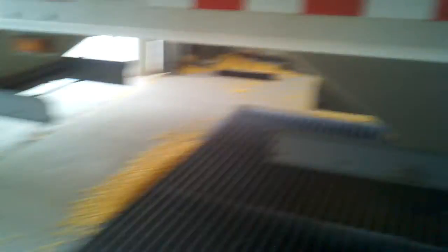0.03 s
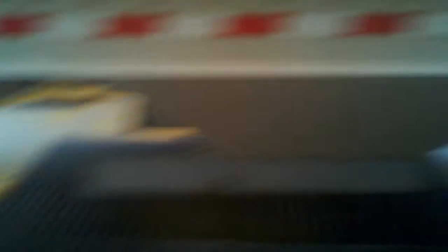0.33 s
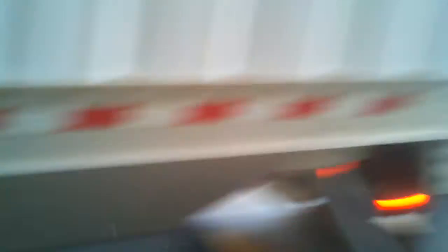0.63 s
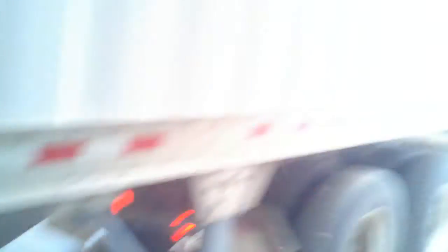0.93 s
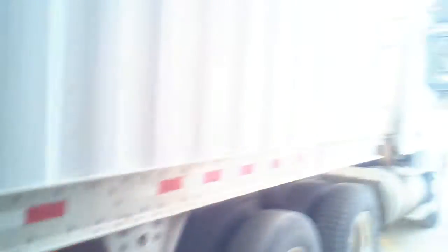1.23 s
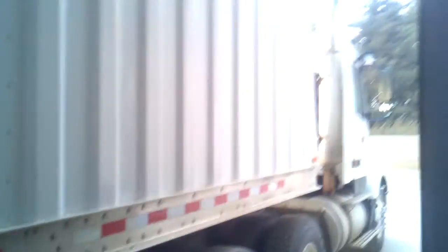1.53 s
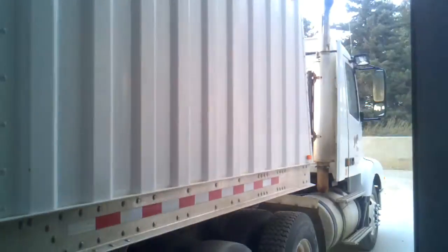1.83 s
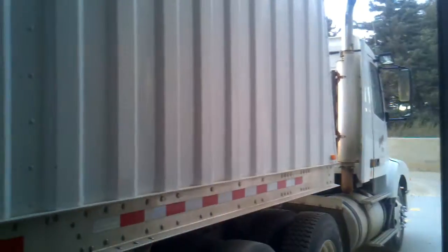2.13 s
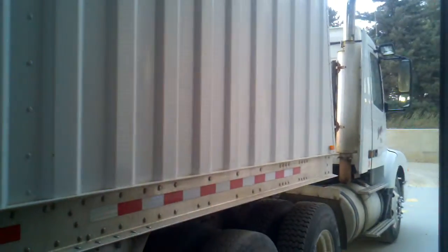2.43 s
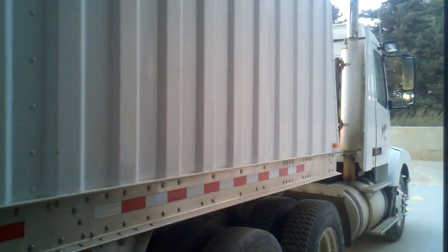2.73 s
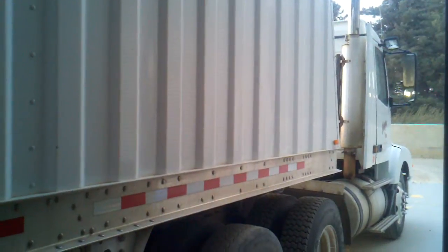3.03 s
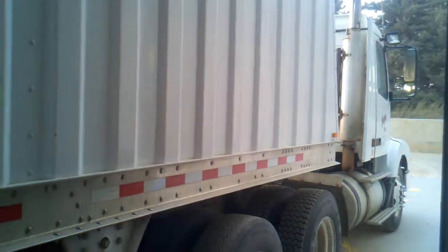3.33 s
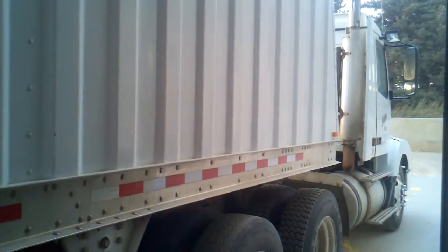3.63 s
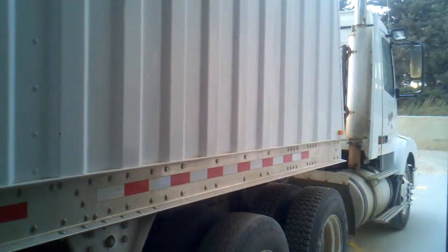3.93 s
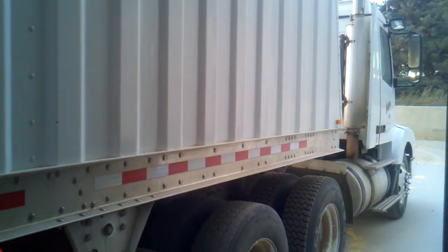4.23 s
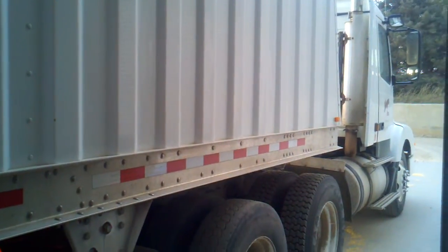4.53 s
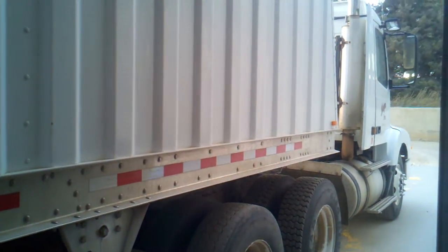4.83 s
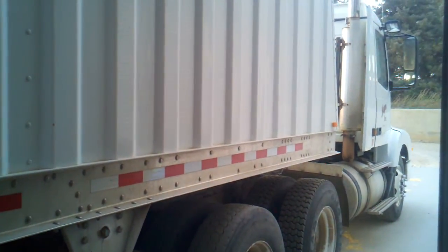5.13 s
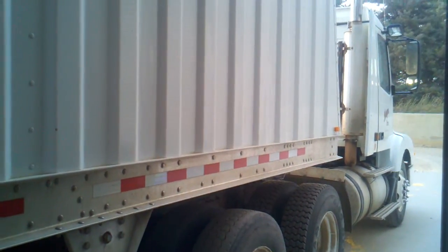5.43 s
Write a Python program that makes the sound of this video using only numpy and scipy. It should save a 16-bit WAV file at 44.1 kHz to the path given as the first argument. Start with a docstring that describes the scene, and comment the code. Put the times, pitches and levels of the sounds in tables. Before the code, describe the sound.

A truck unloads hissing, splashing grain amid steady engine and conveyor noise, while wind starts to buffet and slap the microphone.

```python
"""A grain truck unloads at an elevator, heard through the two microphone ports of a hand-held camera.
From the start, engine and conveyor roar, a drive whines, and grain hisses into the pit, with slugs of it
splashing on steel. After two seconds wind buffets the ports, rumbling, thumping and slapping; each hard
blast ducks the gain control, which then creeps back up. From about three seconds the slugs come again,
louder now, and three clumps ping on bare steel."""
import sys
import numpy as np
from scipy import signal
from scipy.fft import rfft, irfft, next_fast_len
from scipy.io import wavfile
from scipy.ndimage import map_coordinates

SR = 44100
rng = np.random.default_rng(int(sys.argv[2]) if len(sys.argv) > 2 else 0)


def log_audio(samples):
    """Write samples as a 16-bit WAV file to the path given in sys.argv[1]."""
    # one column per channel
    frames = np.atleast_2d(samples).T
    # limit to full scale, then quantise
    limited = np.clip(frames, -1, 1)
    pcm = np.round(limited * 32767).astype(np.int16)
    wavfile.write(sys.argv[1], SR, pcm)


N = 250929

# slugs of grain sliding into the pit: t/s, level/dB, rise/s
GRAIN_SLUGS = [(.3, -41.5, 0.072), (.46, -57, .05), (.66, -45, 0.032), (.8, -40, 0.1), (.875, -33, 0.046),
               (.94, -39.5, 0.021), (1.035, -37.5, 0.038), (2.895, -32.5, 0.021), (3.03, -31.5, 0.037),
               (3.175, -33.5, 0.025), (3.425, -29, 0.04), (3.465, -28.5, 0.035), (3.72, -34, 0.044),
               (3.93, -36.5, 0.035), (4.2, -32.5, 0.043), (4.45, -32, 0.033), (4.755, -33.5, 0.032),
               (4.915, -33, 0.03), (5.29, -33.5, 0.049), (5.43, -41, .05), (5.55, -30, 0.037),
               (5.59, -25, 0.044)]
# clumps hitting bare steel: t/s, scatter level/dB, ping level/dB
GRAIN_CLUMPS = [(3.552, -24.5, -15.5), (4.702, -24.5, -34), (5.496, -30, -22)]
# spectrum of their splash: f/Hz, relative density/dB
SPLASH_SPECTRUM = [(800, -6.5), (2200, -11), (3800, -0.5), (5200, 3.5), (9000, 6), (12000, 1),
                   (14000, -0.5)]
STREAM_DB, PING_HZ = -41.5, 9200

def grain():
    """At the pit, slugs and clumps splash over a steady stream and trickle away; the steel rings."""
    power = sum((amp(db) * burst(s, rise_s, t60_s=0.36)) ** 2 for s, db, rise_s in GRAIN_SLUGS)
    pings = np.zeros(N)
    for s, scatter_db, ping_db in GRAIN_CLUMPS:
        power += (amp(scatter_db) * burst(s, rise_s=0.0027, t60_s=0.32)) ** 2
        ping = np.sin(2 * np.pi * PING_HZ * (clock() - s))
        pings += amp(ping_db) * burst(s, rise_s=0.0007, t60_s=0.0087) * ping
    roughness = unit(amp(1.6 * wobble(1500) + 0.75 * wobble(70)))  # single impacts and small clusters
    stream = grain_stream()
    chute_force = np.sqrt(power + amp(STREAM_DB - 7.5) ** 2)  # the stream keeps it singing between slugs
    steel = amp(-10.5) * chute_force * chute()
    splash = np.sqrt(power) * roughness * diffuse(SPLASH_SPECTRUM)
    return stream + splash + steel + pings


# spectrum of kernels pouring into the pit: f/Hz, relative density/dB
HISS_SPECTRUM = [(800, -44), (2550, -26), (2950, 3.5), (4300, 2), (5300, 0.5), (6500, 5), (9000, 6.5),
                 (12000, 5), (14000, 1.5)]

def grain_stream(ticks_per_s=500, spread_db=3.5):
    """Countless kernels merge into a gently drifting hiss; single ones tick through at random."""
    level_db = STREAM_DB + 1.14 * wobble(4.71) + 0.98 * wobble(13)
    hiss = diffuse(HISS_SPECTRUM)
    hits = (rng.random((2, N)) < ticks_per_s / SR) * amp(spread_db * rng.standard_normal((2, N)))
    patter = unit(filtered(hits, lambda hz: amp(along(HISS_SPECTRUM, hz))))
    return amp(level_db) * (hiss + amp(-8.5) * patter)


# resonances of the steel chute: f/Hz, width/Hz, relative level/dB
CHUTE_MODES = [(4000, 150, -7), (4270, 220, -4.5), (5860, 33, -5), (8660, 300, 0.5)]

def chute(sway_db=3.5):
    """Kernels land on changing spots of the chute, so its resonances take turns."""
    rings = np.zeros((2, N))
    for centre, width, db in CHUTE_MODES:
        strength = amp(db + sway_db * wobble(16))
        rings += strength * filtered(rng.standard_normal((2, N)), lambda hz: resonance(hz, centre, width))
    return unit(rings)


# gusts across the microphone: peak t/s, level/dB, half length/s
WIND_GUSTS = [(2.339, -35, 0.024), (2.722, -30, 0.34), (2.99, -24, 0.0066), (3.034, -14.5, 0.031),
              (3.19, -18, 0.14), (3.633, -22, 0.055), (3.825, -18, 0.059), (3.943, -19.5, 0.04),
              (4.13, -26, 0.043), (4.318, -16.5, 0.031), (4.374, -15.5, 0.022), (4.444, -17, 0.019),
              (4.802, -27, 0.042), (4.93, -20, 0.059), (5.064, -22.5, 0.01), (5.392, -25.5, 0.072)]
# large eddies thumping on the ports: t/s, level/dB
EDDY_THUMPS = [(2.105, -27.5), (2.31, -23.5), (2.324, -13.5), (2.357, -25), (2.538, -21.5), (2.678, -23.5),
               (2.95, -12.5), (3.05, -7.5), (3.141, -17.5), (3.191, -13.5), (3.28, -15.5), (3.346, -15.5),
               (3.998, -18), (4.104, -14), (4.229, -18), (4.278, -13.5), (4.29, -12), (4.4, -13.5),
               (4.413, -8.5), (4.673, -16.5), (4.909, -13.5), (4.926, -14), (5.29, -17)]
# spectra of the low buffeting and of the flutter above it: f/Hz, relative density/dB
BUFFET_SPECTRUM = [(20, -31), (45, -7.5), (70, -7.5), (120, 2), (170, -1.5), (240, -3), (330, -7),
                   (520, -18), (800, -38), (1500, -55)]
FLUTTER_SPECTRUM = [(120, -30), (300, 4), (520, 2), (700, -8.5), (1000, -17.5), (1500, -21.5), (2400, -21),
                    (5000, -61)]
BREEZE_FROM_S, BREEZE_RISE_S, BREEZE_DB = 2.5, 0.054, -37.5  # light air from the open door

def wind():
    """Right on the microphone, gusts and eddies ride on a breeze; the harder they blow, the brighter."""
    power = (amp(BREEZE_DB) * np.clip((clock() - BREEZE_FROM_S) / BREEZE_RISE_S, 0, 1)) ** 2
    power += sum(amp(db) ** 2 * bell(s, half_s) for s, db, half_s in WIND_GUSTS)
    power *= amp(2 * wobble(65)) ** 2  # small eddies shake the level
    power += sum(amp(db) ** 2 * bell(s, half_s=0.0059) for s, db in EDDY_THUMPS)
    force = np.sqrt(power)
    return force * turbulence(BUFFET_SPECTRUM) + force ** 1.71 * turbulence(FLUTTER_SPECTRUM)


# slaps of air, mostly on one port: t/s, level/dB, f/Hz, left share/0-1, ring re slap/dB
AIR_SLAPS = [(2.3326, -1.5, 310, 0.04, 1), (2.9493, -8.5, 476, 1, -15), (2.9752, -13, 350, 0.9, -14),
             (2.9915, -16, 420, 1, -10), (3.0168, -1, 553, 1, -13), (3.0272, -13, 500, 0, -12),
             (3.0461, -2, 430, 0.7, -27), (3.05, 2, 253, 0.06, -15), (3.0549, 5, 362, 0.93, -28),
             (3.1425, -12, 480, 1, -14), (3.2737, -13, 520, 1, -14), (3.289, -6.5, 480, 1, -14),
             (3.348, -10.5, 480, 1, -1), (3.804, -11, 600, 0.6, -5), (4.3045, -9.5, 590, 0, -11),
             (4.3804, -8, 800, 0, -23), (4.3941, 2.5, 450, 0.9, -3), (4.408, -1.5, 755, 0.9, -26),
             (4.4108, -5, 483, 0.2, -37), (4.415, 6, 352, 0.94, -14), (4.424, -5, 420, 1, -3),
             (4.922, -6.5, 388, 0.9, -11.5)]
RING_HZ, SLAP_ROUNDNESS = 282, 3.13  # a rounder slap is duller and swings more

def air_slaps():
    """Air strikes a port: a rounded push with suction on either side, then a hollow ring."""
    slaps = np.zeros((2, N))
    for s, db, hz, left, ring_db in AIR_SLAPS:
        age = clock() - s
        scaled_age = 2 * np.pi * hz * age / SLAP_ROUNDNESS
        swing = (SLAP_ROUNDNESS + 1) * np.arctan(scaled_age)
        push = np.cos(swing) / np.hypot(1, scaled_age) ** (SLAP_ROUNDNESS + 1)
        ring = amp(ring_db) * burst(s, rise_s=0.00047, t60_s=0.044) * np.cos(2 * np.pi * RING_HZ * age)
        slaps += amp(db) * np.outer([left, 1 - left], push + ring)
    return slaps


# the whine at the microphone, uneven as the camera swings round, then steady: t/s, level/dB
WHINE_LEVELS = [(.1, -52), (.45, -49.5), (.7, -54), (.98, -48), (1.1, -43), (1.36, -42.5), (1.45, -47),
                (1.58, -55), (1.66, -45), (1.85, -45), (2.9, -47), (3.4, -46.5), (4.1, -44.5), (4.65, -46),
                (5.2, -46.5)]
# resonances of the drive housing: f/Hz, width/Hz, relative level/dB
HOUSING_MODES = [(1700, 14, 2.5), (1737, 53, 0), (1825, 38, -0.5), (1760, 23, -14)]
# flare-ups of the rasp: peak t/s, level/dB, half length/s
RASP_FLARES = [(.02, -48, 0.073), (0.2, -41, 0.025), (0.402, -58, 0.074), (1.826, -60, 0.028),
               (2.21, -61, 0.032), (5.192, -41, 0.033), (5.425, -49, 0.092)]
WHINE_HZ, RASP_RE_WHINE_DB = 1755, -4.5

def conveyor_drive():
    """The conveyor drive whines with a faint octave and rasps in its housing, at times more loudly."""
    whine_db = np.interp(clock(), *np.transpose(WHINE_LEVELS))
    whine = tone(WHINE_HZ, drift_rad=0.24, unsteady_db=2, lead_rad=0.13)
    whine += amp(-28) * tone(2 * WHINE_HZ, drift_rad=1.0, unsteady_db=-11)
    housing = lambda hz: sum(amp(db) * resonance(hz, centre, width) for centre, width, db in HOUSING_MODES)
    mid, side = filtered(rng.standard_normal((2, N)), housing)
    rasp = unit(np.array([mid + 0.6 * side, mid - 0.6 * side]) * amp(0.99 * wobble(25)))
    flares = sum(amp(db) * bell(s, half_s) for s, db, half_s in RASP_FLARES)
    return amp(whine_db) * whine + (amp(whine_db + RASP_RE_WHINE_DB) + flares) * rasp


# spectrum of engine and conveyor: f/Hz, relative density/dB
ROAR_SPECTRUM = [(20, -9), (70, -5), (120, 0.5), (210, -2.5), (290, 2), (400, -2), (520, -3.5), (900, -5),
                 (1250, -8.5), (1600, -10), (1820, -4.5), (2000, -8.5), (2300, -16.5), (3200, -24),
                 (6000, -29)]
# moments when they labour: peak t/s, boost/dB, half length/s
LOAD_SURGES = [(0.906, 1.0, 0.11), (3.714, 4, 0.16)]
# their steady tones: f/Hz, relative level/dB
HUM_LINES = [(349.9, -36.5), (479.1, -39.5), (554.5, -41), (818.3, -42), (914, -46.5), (979.8, -51),
             (1077, -45.5), (1255, -53), (1486, -46.5)]
ROAR_DB = -35.5

def machinery():
    """Farther off, engine and conveyor fill the place with a broad roar and weak hum lines."""
    roar_db = ROAR_DB + sum(db * bell(s, half_s) for s, db, half_s in LOAD_SURGES)
    roar = amp(roar_db + 1.04 * wobble(29.94)) * diffuse(ROAR_SPECTRUM)
    hum = sum(amp(db - 12.5) * tone(hz, drift_rad=1.24, unsteady_db=4) for hz, db in HUM_LINES)
    return roar + hum


def diffuse(spectrum):
    """Noise arriving from all around: the two ports hear long waves alike, short ones unrelated."""
    def response(hz):
        alike = 0.98 * np.sinc(hz / 1400)
        return amp(along(spectrum, hz)) * np.sqrt(np.abs([1 + alike, 1 - alike]))
    mid, side = filtered(rng.standard_normal((2, N)), response)
    return unit(np.array([mid + side, mid - side]))


def turbulence(spectrum):
    """Unrelated pressure at each port, scaled to a steady rms difference between them."""
    ports = filtered(rng.standard_normal((2, N)), lambda hz: amp(along(spectrum, hz)))
    return ports / running_rms(np.diff(ports, axis=0))


def tone(hz, drift_rad, unsteady_db, lead_rad=0):
    """A machine tone that drifts in phase and strength; the left port leads by lead_rad."""
    phase = 2 * np.pi * hz * clock() + drift_rad * wobble(9)
    strength = amp(unsteady_db * wobble(20))
    return unit(strength * np.sin([phase + lead_rad / 2, phase - lead_rad / 2]))


def resonance(hz, centre, width):
    """Gain of one resonance, 1 at its centre."""
    return 1 / (1 + ((hz - centre) / width * 2) ** 2)


def burst(start_s, rise_s, t60_s):
    """An envelope that rises straight to 1, then dies away."""
    age = clock() - start_s
    return np.clip(age / rise_s, 0, 1) * amp(-60 * np.clip((age - rise_s) / t60_s, 0, 2))


def bell(peak_s, half_s):
    """A Gaussian swell from 0 to 1 and back."""
    return np.exp(-((clock() - peak_s) / half_s) ** 2 / 2)


def wobble(rate):
    """A smooth random curve, rate knots a second."""
    return map_coordinates(rng.standard_normal(int(N * rate / SR) + 4), [clock() * rate])


def filtered(x, response):
    """x through a complex frequency response."""
    size = next_fast_len(N + 8192)
    return irfft(rfft(x, size) * response(np.fft.rfftfreq(size, 1 / SR)), size)[..., :N]


def along(points, hz):
    """Points of f/Hz and value, read on a log frequency axis."""
    knots_hz, values = np.transpose(points)
    return np.interp(np.log(hz + 1), np.log(knots_hz + 1), values)


def running_rms(x):
    """Strength of all channels together over a 25 ms window."""
    window = np.hanning(SR // 40)
    power = signal.fftconvolve(np.mean(x ** 2, axis=0), window / window.sum(), "same")
    return np.sqrt(np.abs(power) + 1e-12)


def amp(db):
    """Decibels to gain."""
    return 10 ** (np.asarray(db) / 20)


def unit(x):
    """x at rms 1."""
    return x / np.sqrt(np.mean(x ** 2) + 1e-20)


def clock():
    """The time of every sample in seconds."""
    return np.arange(N) / SR


def scene():
    """Pressure at the left and right microphone ports."""
    return machinery() + conveyor_drive() + grain() + wind() + air_slaps()


def widen(ports, delay_s=1 / 2600):
    """Each channel subtracts the delayed other port: distant bass cancels, wind does not."""
    crossfeed = [(500, 1.0), (2000, 0.9), (2700, 1.0), (5200, 0.26), (8000, 0.16)]  # f/Hz, share
    delay = lambda hz: np.exp(-2j * np.pi * hz * delay_s)
    return ports - filtered(ports[::-1], lambda hz: np.clip(along(crossfeed, hz), 0, .98) * delay(hz))


def gain_control(x, ceiling_db, recovery_db_per_s):
    """The gain ducks at once to hold the rms ceiling, then climbs back steadily."""
    climb_db = recovery_db_per_s * clock()
    allowed_db = ceiling_db - 20 * np.log10(running_rms(x))
    duck_db = np.minimum.accumulate(np.minimum(allowed_db - climb_db, 0))
    return x * amp(climb_db + duck_db)


def record(dry):
    """The camera widens the stereo image, rides its gain, clips and cuts the top."""
    held = gain_control(widen(dry), ceiling_db=-12.5, recovery_db_per_s=3.4)
    return filtered(np.clip(held, -1, 1), lambda hz: hz < 14150)


dry = scene()
out = record(dry)
log_audio(out)
```